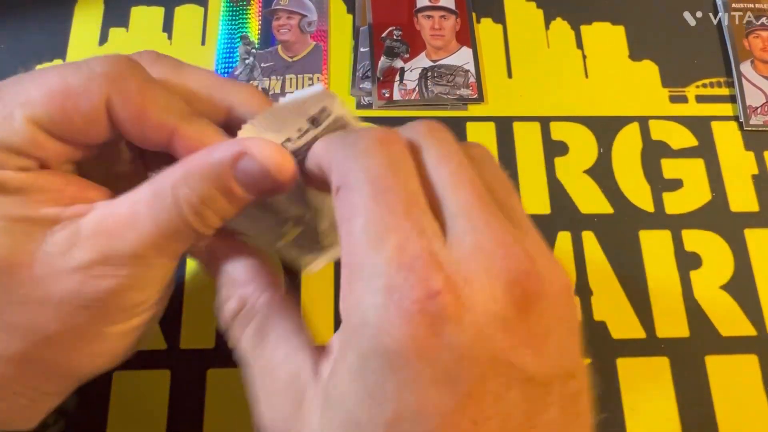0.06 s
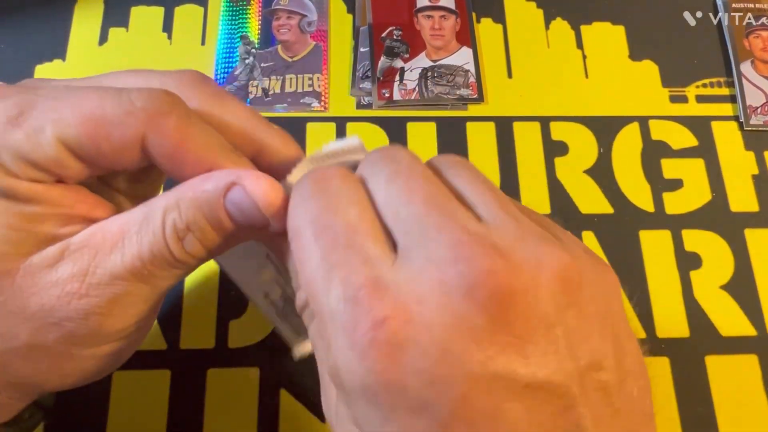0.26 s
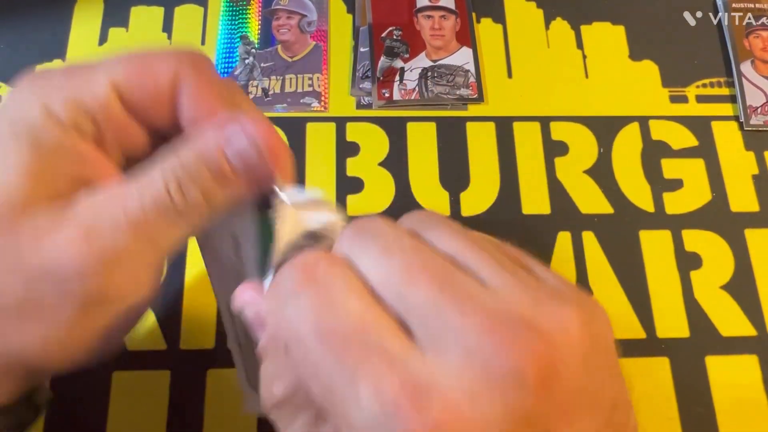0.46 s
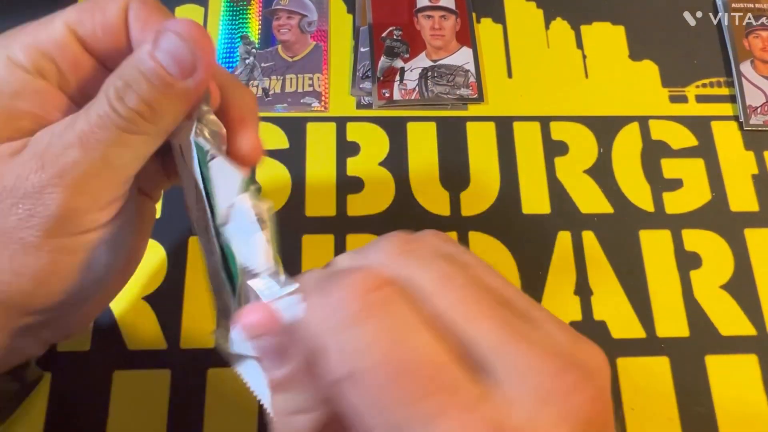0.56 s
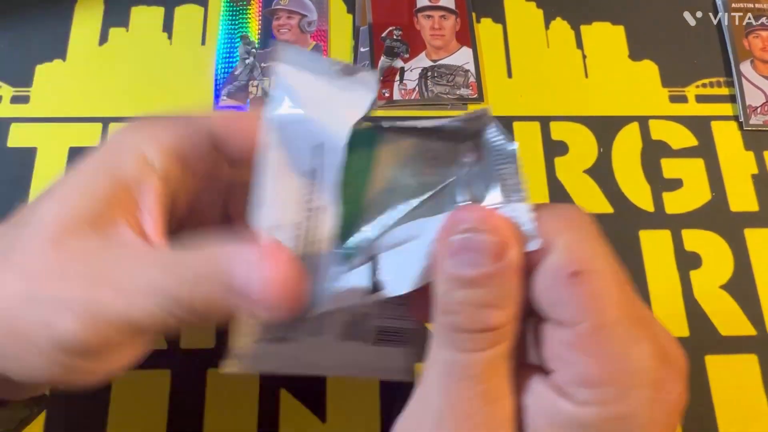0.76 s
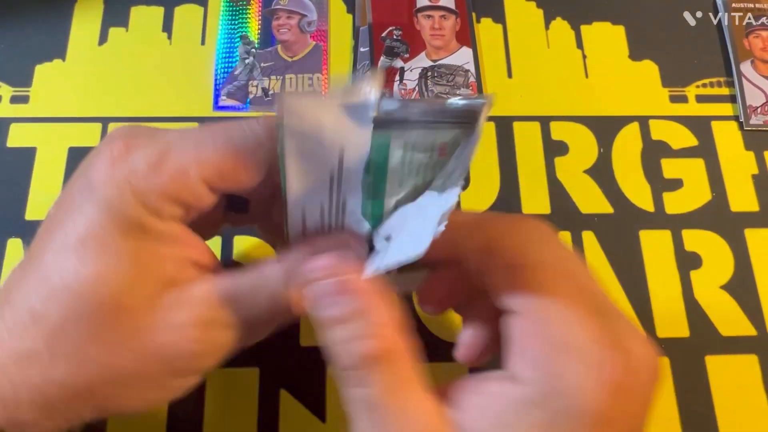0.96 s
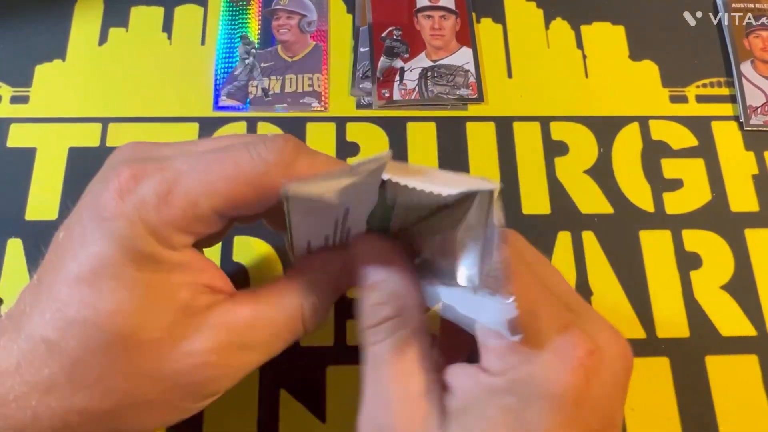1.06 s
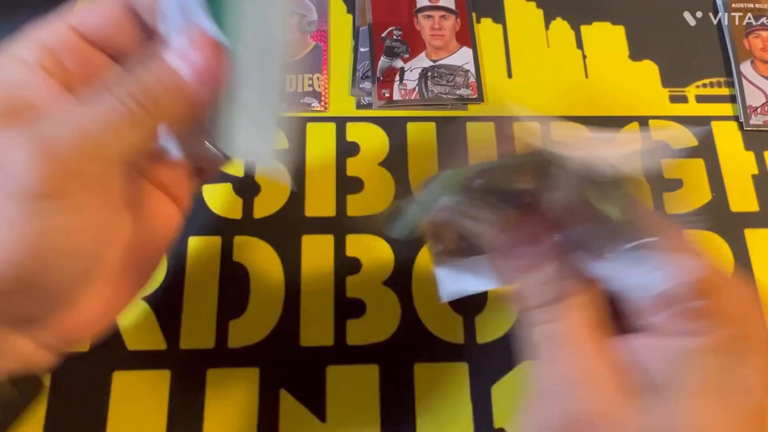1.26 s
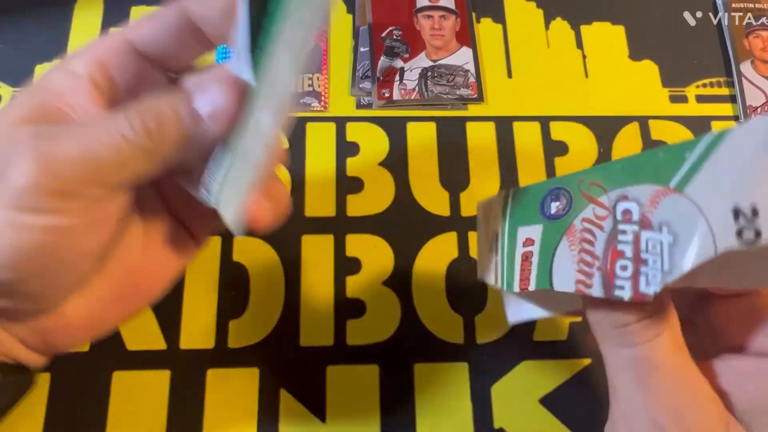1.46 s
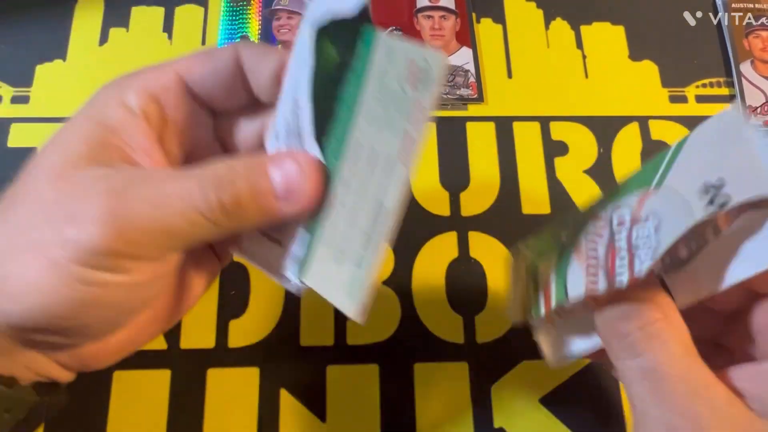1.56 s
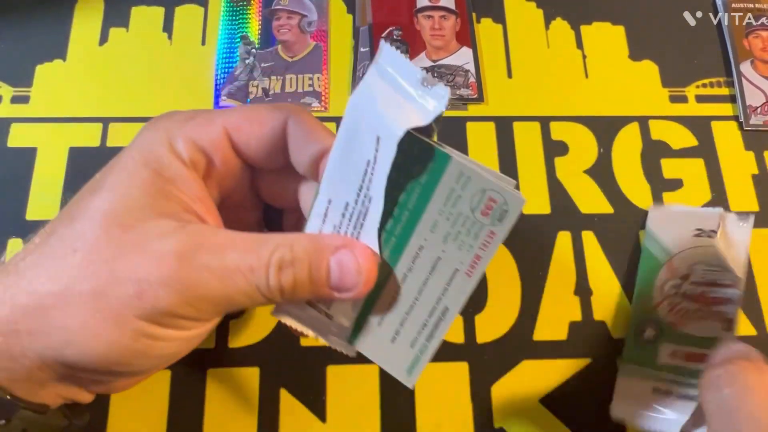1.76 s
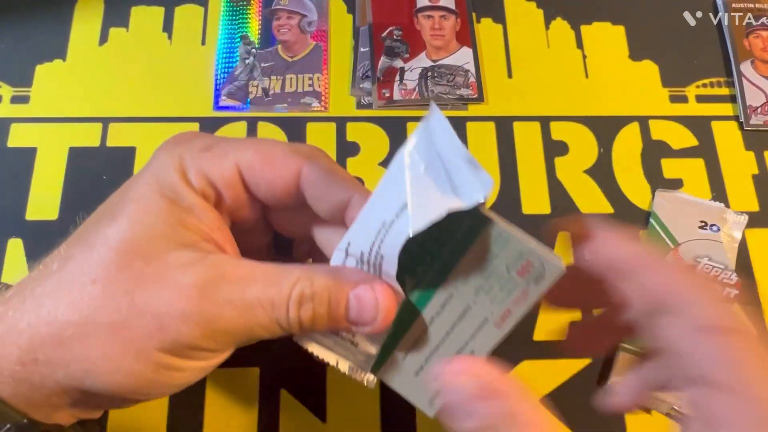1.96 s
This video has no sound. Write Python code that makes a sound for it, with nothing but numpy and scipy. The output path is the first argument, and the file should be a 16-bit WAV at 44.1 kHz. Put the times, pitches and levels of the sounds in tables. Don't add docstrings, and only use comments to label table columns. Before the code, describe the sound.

Foil wrapper crinkling and tearing, close and dry in stereo. Fine crackle and sharp crease snaps from 0 s, growing into a first rip at 0.41-0.59 s. Uneven crinkles and dull hollow pops follow until a louder, boomier second rip at 1.12-1.3 s. A very faint whistling rub lingers to 1.5 s, then light scattered crackles around 1.5-1.9 s fade over quiet room air and low table rumble.

```python
import sys
import numpy as np
from scipy import signal
from scipy.fft import rfft, irfft
from scipy.io import wavfile
from scipy.ndimage import uniform_filter1d

SR = 44100
rng = np.random.default_rng(int(sys.argv[2]) if len(sys.argv) > 2 else 0)


def dump(signal):
    limited = np.clip(np.atleast_2d(signal).T, -1, 1)
    pcm = np.round(limited * 32767).astype(np.int16)
    wavfile.write(sys.argv[1], SR, pcm)


def gain_from_db(level_db):
    decades = np.asarray(level_db, float) / 20
    return 10 ** decades


N = 88200

# (frequency [Hz], level [dB])
FOIL = [(250, -33), (2000, -10), (5000, -6.5), (7500, -7), (10000, -1), (11500, -7.5), (15600, -6),
        (16800, -35)]
# (frequency [Hz], level [dB])
POUCH = [(71, -58), (120, -16.5), (340, -7), (422, -10.5), (797, -5), (1390, -8), (2500, -5), (3250, -10.5),
         (5500, -120)]


def evened(x):
    return x / np.sqrt(np.mean(x ** 2) + 1e-20)


def along_pitch(hz, points):
    f, value = np.transpose(points)
    return np.interp(np.log(hz + 1), np.log(f + 1), value)


def colour(x, points):
    hz = np.fft.rfftfreq(x.shape[-1], 1 / SR)
    return irfft(rfft(x) * gain_from_db(along_pitch(hz, points)), x.shape[-1])


def curve(rows, order):
    rows = np.array(rows)
    return np.interp(np.arange(N) / SR, rows[:, 0], rows[:, order])


def resonate(x, hz, width):
    turn = np.exp(2j * np.pi * np.cumsum(hz * np.ones(x.shape[-1])) / SR)
    r = np.exp(-np.pi * width / SR)
    return 2 * (turn * signal.lfilter([1 - r], [1, -r], x / turn + 1e-18)).real


def crackle(per_s, spread_db, grain_s, clump_db, clump_s):
    clump = evened(uniform_filter1d(rng.standard_normal(N), int(clump_s * SR)))
    size_db = spread_db * np.minimum(rng.exponential(1, N), 4) + clump_db * clump
    slips = gain_from_db(size_db) * (rng.random(N) < per_s / SR)
    shape = signal.lfilter([1], [1, -np.exp(-1 / (grain_s * SR))], slips)
    x = shape * rng.standard_normal((2, N))
    return x / np.sqrt(uniform_filter1d((x ** 2).mean(0), 3000) + 1e-12)


def room_tone():
    # (frequency [Hz], level [dB])
    air_colour = [(25, 5), (92, 9.5), (220, -2), (1020, -19), (1160, -8.5), (2610, -18.5), (9070, -50),
                  (16000, -51)]
    # (time [s], level [dB])
    rumble = [
        (0, -60),
        (.37, -65),
        (.44, -47),
        (.6, -57),
        (.82, -41.5),
        (1, -64),
        (1.24, -38),
        (1.4, -61.5),
        (2, -57.5),
    ]
    left, right, common, table = rng.standard_normal((4, N))
    air = evened(colour(np.array([common + .4 * left, common + .4 * right]), air_colour))
    low = resonate(resonate(table, 75, 70), 75, 70)
    low = evened(colour(low, [(28, -22), (45, 0)]))
    return gain_from_db(-58) * air + gain_from_db(curve(rumble, order=1) - 1.5) * low


def rustle():
    # (time [s], crackle level [dB], pouch level re crackle [dB])
    hands = [
        [(0, -45, -15), (.03, -46, -14), (.07, -46, -18), (.135, -40.5, -16), (.195, -46.5, -11)],
        [(.215, -36.5, -24), (.24, -37.5, -22), (.275, -47.5, -27), (.3, -45.5, -22), (.35, -45.5, -16),
         (.365, -39.5, -23), (.41, -33.5, -18)],
        [(.595, -54, -3.5), (.66, -41.5, -5.5), (.71, -56, 1), (.725, -43.5, -5), (.795, -48, 0),
         (.83, -40.5, -1)],
        [(.895, -49.5, -5.5), (.94, -43.5, 2.5), (1.025, -50, -10), (1.06, -36, -6), (1.112, -50, 1)],
        [(1.3, -46, -4), (1.35, -62.5, -3), (1.46, -66.5, 3.5), (1.53, -51, -4.5), (1.6, -48, 1),
         (1.65, -52.5, -2.5)],
        [(1.715, -65, 5.5), (1.73, -50, -6), (1.76, -50, -1), (1.81, -60, -7.5), (1.87, -56.5, -1.5),
         (1.93, -66.5, 0.5), (2, -76.5, -19)],
    ]
    fine = crackle(per_s=2500, spread_db=2.2, grain_s=.002, clump_db=2, clump_s=.012)
    flex = crackle(per_s=370, spread_db=6.5, grain_s=.0057, clump_db=-2, clump_s=.008)
    fine, flex = evened(colour(fine, FOIL)), evened(colour(flex, POUCH))
    rows = np.concatenate(hands)
    return gain_from_db(curve(rows, order=1) + 4.5) * (fine + gain_from_db(curve(rows, order=2)) * flex)


def snaps():
    # (time [s], peak level [dB], brightest frequency [Hz], rattle level re crack [dB])
    pinch = [(0.0122, -20, 9900, -2), (0.064, -31.5, 8950, -17), (0.0854, -21, 8840, -14.5),
             (0.1087, -31.5, 8900, -4), (0.1224, -19, 8450, -12.5), (0.1316, -29, 8200, -10),
             (0.1485, -15.5, 9050, -14.5), (0.17, -32.5, 5000, -11.5), (0.2007, -12.5, 9700, -11),
             (0.2522, -23, 8760, -17), (0.2807, -24.5, 6100, 11), (0.308, -15, 8820, -6.5),
             (0.3221, -20.5, 9000, -15), (0.332, -26.5, 8990, -8), (0.3596, -21.5, 9050, -13.5),
             (0.387, -23, 8160, -6), (0.3958, -20, 9320, -6), (0.409, -13.5, 8480, -12.5),
             (0.4299, -13, 8840, 2), (0.4465, -17.5, 9440, 10.5), (0.4736, -12, 8620, -25),
             (0.5369, -12.5, 8200, -21), (0.5454, -22, 9600, -15)]
    peel = [(0.6118, -25, 9380, -15), (0.638, -27.5, 6860, -5), (0.6615, -24.5, 9100, -12),
            (0.717, -17, 3120, -19), (0.7233, -17.5, 9800, -8.5), (0.7302, -23.5, 6420, -10),
            (0.7365, -19, 8950, 6), (0.7406, -19, 9500, -11.5), (0.755, -19.5, 10000, -12),
            (0.7624, -23, 9600, -6), (0.8059, -19, 9300, -2), (0.8176, -27, 9240, -8),
            (0.8343, -19, 6500, -8), (0.84, -14, 9500, -16.5), (0.8422, -14, 9000, -10),
            (0.8646, -17.5, 6200, -10.5), (0.9043, -24, 5620, -14), (0.9103, -18.5, 8900, -5),
            (0.9313, -19, 8400, -10), (0.9516, -23.5, 5470, -6.5), (0.9774, -18, 9800, -5),
            (1.038, -18, 9800, -2), (1.049, -13, 9750, -3), (1.08, -15, 5460, -18),
            (1.1181, -9.5, 9240, -8.5), (1.1271, -10.5, 9720, -2), (1.139, -12.5, 8580, -17)]
    after = [(1.1724, -11.5, 9300, 6), (1.1917, -8, 9320, -3), (1.2102, -13, 2600, -1),
             (1.228, -7.5, 9000, -20), (1.3107, -26, 8700, -12), (1.4134, -26.5, 4600, -13.5),
             (1.505, -25.5, 9400, -16), (1.5177, -28.5, 2890, -8), (1.5542, -21.5, 5300, -30),
             (1.5678, -27, 5390, -4), (1.5843, -20, 5160, -12), (1.5923, -31, 9250, -12),
             (1.6069, -19, 8000, -14), (1.6176, -20, 7700, -4.5), (1.6755, -36.5, 3340, -11),
             (1.7219, -33.5, 5580, -8), (1.7293, -24, 9400, -18), (1.7426, -20, 9000, -8.5),
             (1.779, -31, 5400, -12), (1.836, -30.5, 9120, -9), (1.8616, -26, 4250, -22),
             (1.8917, -27.5, 10100, -24), (1.9098, -36, 6190, -10)]
    rows = pinch + peel + after
    out = np.zeros((2, N + 1024))
    t = np.maximum(np.arange(1024) / SR - .0005, 0)
    attack = np.minimum(t / .0003, 1)
    crack, rattle = np.exp(-t / .0005), np.exp(-t / .005)
    for (s, db, hz, rattle_db), z in zip(rows, rng.standard_normal((len(rows), 2, 1024))):
        burst = z * attack * (crack + gain_from_db(rattle_db) * rattle)
        burst[:, 30] += 2.5
        burst = burst + gain_from_db(7) * resonate(burst, hz, hz / 2)
        burst = colour(colour(burst, [(hz, 0), (2 * hz, -7)]), FOIL)
        start = round(s * SR)
        out[:, start:start + 1024] += gain_from_db(db) * burst / np.std(burst[:, :64], axis=1, keepdims=True)
    return gain_from_db(-5) * out[:, :N]


def pops():
    # (time [s], peak level [dB], pitch [Hz])
    flexes = [(0.044, -45.5, 665), (0.082, -42, 1380), (0.148, -46, 436), (0.202, -41.5, 925),
              (.434, -37.5, 370), (0.662, -38.5, 745), (0.724, -36.5, 600), (.735, -48, 230),
              (0.795, -41.5, 285), (0.838, -35.5, 1010), (0.863, -41, 780), (.908, -41.5, 200),
              (0.928, -38.5, 735), (1.048, -31, 770), (1.134, -32.5, 690), (1.139, -34, 352),
              (1.187, -18.5, 802), (1.203, -29.5, 310), (1.221, -23, 240), (1.232, -24, 292),
              (1.245, -28.5, 894), (1.247, -27.5, 216), (1.522, -47, 360), (1.569, -46.5, 355),
              (1.612, -43.5, 345), (1.751, -50.5, 263)]
    out = np.zeros((2, N + 2048))
    t = np.arange(2048) / SR
    thump = t * np.exp(-t / .0035)
    for (s, db, hz), z in zip(flexes, rng.standard_normal((len(flexes), 2, 2048))):
        pop = resonate(z * thump, hz, 0.54 * hz)
        pop = colour(resonate(pop, hz, 3.6 * hz), POUCH)
        start = round(s * SR)
        out[:, start:start + 2048] += gain_from_db(db) * pop / abs(pop).max(axis=1, keepdims=True)
    return gain_from_db(7.5) * out[:, :N]


def rip(rows, first_hz, last_hz, width, broad_db):
    t = np.arange(N) / SR
    # (frequency [Hz], level [dB])
    edge_colour = [(220, -27), (700, -9.5), (2000, 0), (6000, 0), (9800, 1), (11500, -3), (15600, -6),
                   (16800, -56)]
    on = np.clip((t - rows[0][0]) / .0039, 0, 1) * np.clip((rows[-1][0] - t) / .018, 0, 1)
    slips = crackle(per_s=6000, spread_db=1.8, grain_s=.001, clump_db=1.1, clump_s=.005)
    fat = crackle(per_s=1200, spread_db=1.8, grain_s=.003, clump_db=1.2, clump_s=.008)
    hiss = evened(colour(slips, edge_colour))
    pitch = np.interp(t, [rows[2][0], rows[-2][0]], [first_hz, last_hz])
    boom = evened(resonate(fat, pitch, width)) + gain_from_db(broad_db) * evened(colour(fat, POUCH))
    return on * gain_from_db(curve(rows, order=1) + 4) * (hiss + gain_from_db(curve(rows, order=2)) * evened(boom))


def whine():
    # (frequency [Hz], width [Hz], level [dB])
    tones = [
        (1155, 23, 2.5),
        (2050, 54, -20),
        (3380, 86, -7),
    ]
    on = np.interp(np.arange(N) / SR, [1.3, 1.34, 1.5, 1.54], [0, 1, 1, 0])
    whistle = 0
    for hz, width, db in tones:
        whistle = whistle + gain_from_db(db) * evened(resonate(rng.standard_normal(N), hz, width))
    return gain_from_db(-61.5) * on * whistle


def facets(x):
    hz, t, z = signal.stft(x, SR, nperseg=128)
    blotch = uniform_filter1d(rng.standard_normal(z.shape[1:]), size=5, axis=0)
    blotch = evened(uniform_filter1d(blotch, size=3, axis=1))
    depth_db = 1
    return signal.istft(z * gain_from_db(depth_db * blotch - depth_db / 2), SR, nperseg=128)[1][:, :N]


def ports(x):
    # (frequency [Hz], left minus right [dB])
    pan = [(150, 9.5), (700, -5.5), (1800, 4.5), (4400, -5.5), (9000, -2.1)]
    # (frequency [Hz], left-right likeness [0 to 1])
    likeness = [(100, 0.96), (700, 0.86), (2200, 0.38), (4000, 0.13), (6500, 0.1)]
    t60_s, room_db = .07, -15
    t = np.arange(4000) / SR
    tail = rng.standard_normal((2, 4000)) * gain_from_db(-60 * t / t60_s) * (t > .003)
    echo = signal.fftconvolve(x, tail / np.linalg.norm(tail[0]), axes=1)[:, :N]
    a, b = rfft(x + gain_from_db(room_db) * echo)
    hz = np.fft.rfftfreq(N, 1 / SR)

    def read(points):
        f, value = np.transpose(points)
        return np.interp(np.log(hz + 1), np.log(f), value)

    alike = np.clip(read(likeness), 0, 1)
    merged = np.clip((hz - 7600) / 400 + .5, 0, 1)
    left_late = np.exp(-2j * np.pi * hz * .00025)
    right_late = np.exp(-2j * np.pi * hz * .000286)
    left = a * ((1 - merged) * left_late + merged)
    right = (1 - merged) * (alike * a + np.sqrt(1 - alike ** 2) * b) - merged * a * right_late
    half_pan = gain_from_db(read(pan) / 2)
    return irfft(np.array([left * half_pan, right / half_pan]), N)


def scene():
    # (time [s], level [dB], pouch level re level [dB])
    first_rip = [
        (.405, -43, -8),
        (.41, -33.5, -14),
        (.428, -22.5, -17.5),
        (.436, -24, -3.5),
        (.482, -27, 2),
        (.5, -30.5, -7),
        (.53, -34.5, -8),
        (.539, -24.5, -7.5),
        (.59, -54, -21),
    ]
    second_rip = [
        (1.115, -36, 0),
        (1.121, -32.5, -17),
        (1.155, -30, -11.5),
        (1.179, -26.5, 1),
        (1.223, -25.5, -2),
        (1.231, -20, -4.5),
        (1.257, -22, -7.5),
        (1.301, -48, -17),
        (1.31, -37, -12),
    ]
    air = room_tone()
    tears = rip(first_rip, first_hz=1424, last_hz=1250, width=315, broad_db=-22)
    tears = tears + rip(second_rip, first_hz=1250, last_hz=1100, width=290, broad_db=0)
    foil = facets(rustle() + tears) + snaps() + pops() + whine()
    return gain_from_db(-1.5) * ports(foil) + air


def band_limit(x):
    return signal.sosfilt(signal.butter(12, 16800, fs=SR, output="sos"), x)


def record(dry):
    ceiling, gate_hz, gate_db, hush_db = .8, 10060, -7, -72.5
    dry = ceiling * np.tanh(dry / ceiling)
    mid_side = np.array([dry[0] + dry[1], dry[0] - dry[1]]) / 2
    hz, t, z = signal.stft(mid_side, SR, nperseg=512)
    band = uniform_filter1d(abs(z) ** 2, size=10, axis=1)
    usual = band.max(axis=0).mean(axis=0)
    floor = np.maximum(usual * gain_from_db(2 * gate_db), gain_from_db(2 * hush_db))
    kept = (band > floor) | (hz[:, None] < gate_hz)
    mid, side = signal.istft(z * kept, SR, nperseg=512)[1][:, :N]
    return band_limit(np.array([mid + side, mid - side]))


dry = scene()
out = record(dry)
dump(out)
```